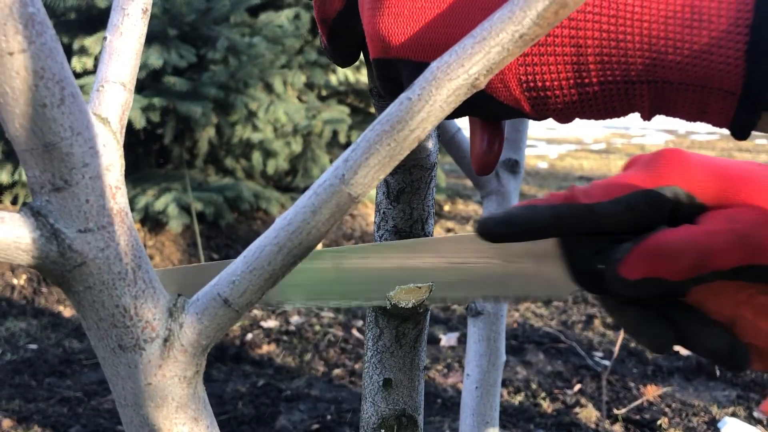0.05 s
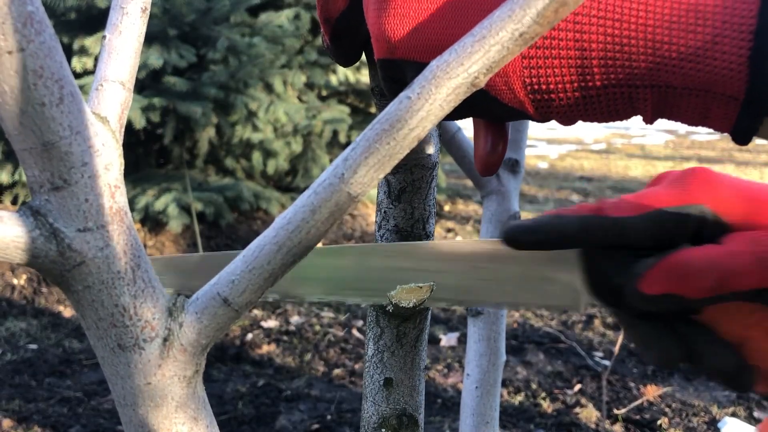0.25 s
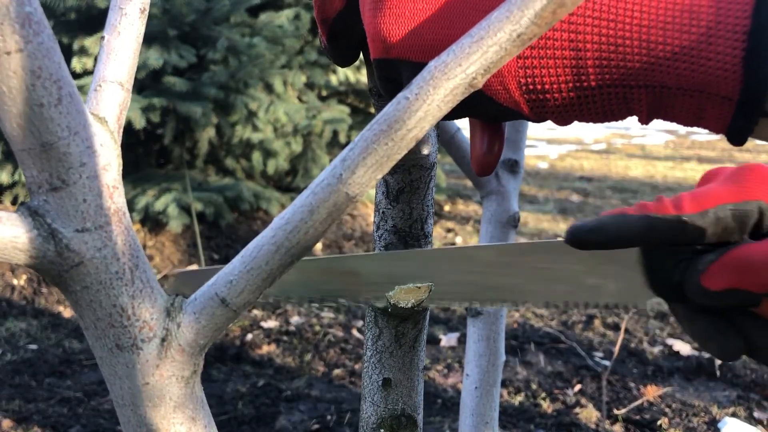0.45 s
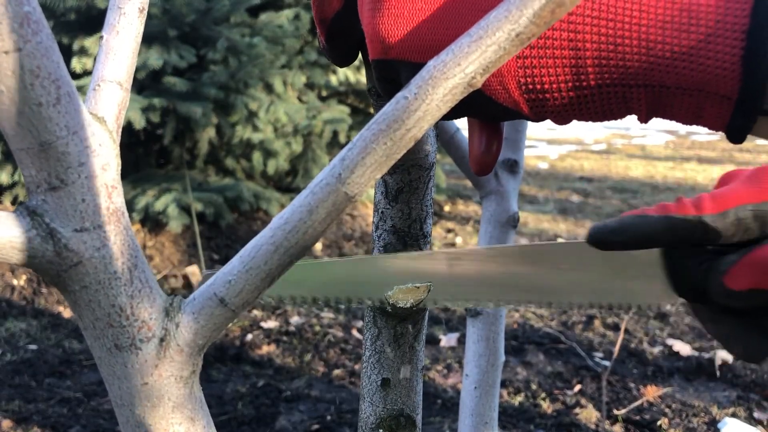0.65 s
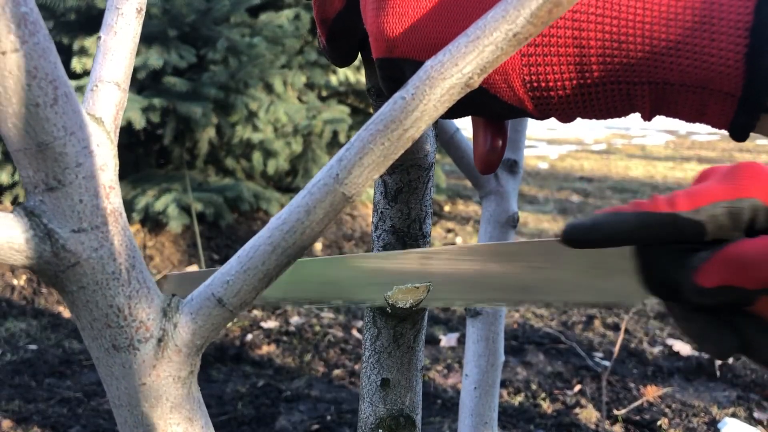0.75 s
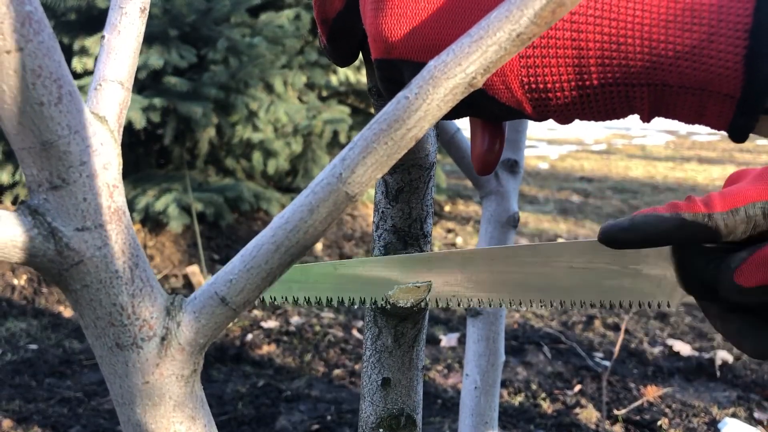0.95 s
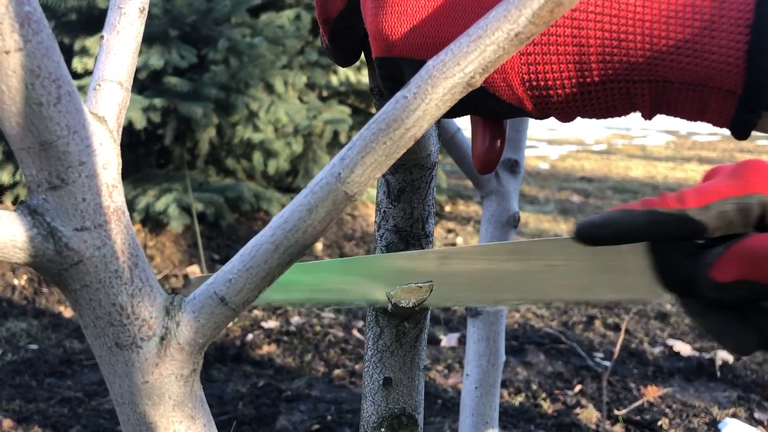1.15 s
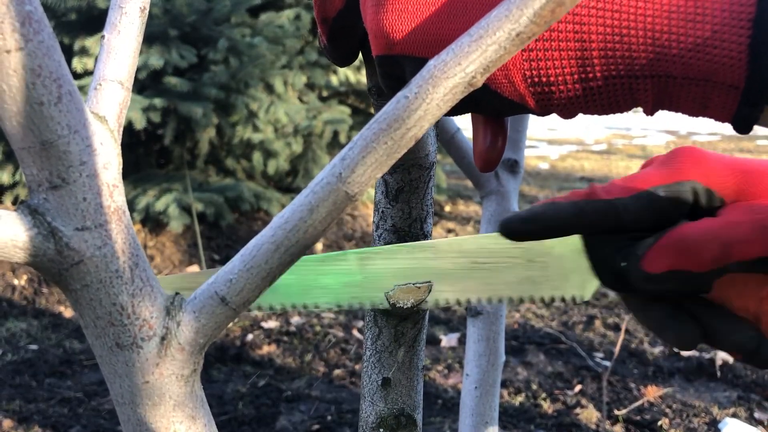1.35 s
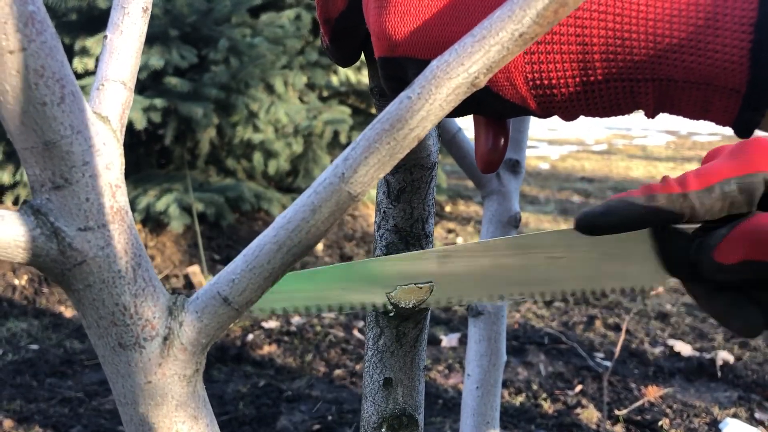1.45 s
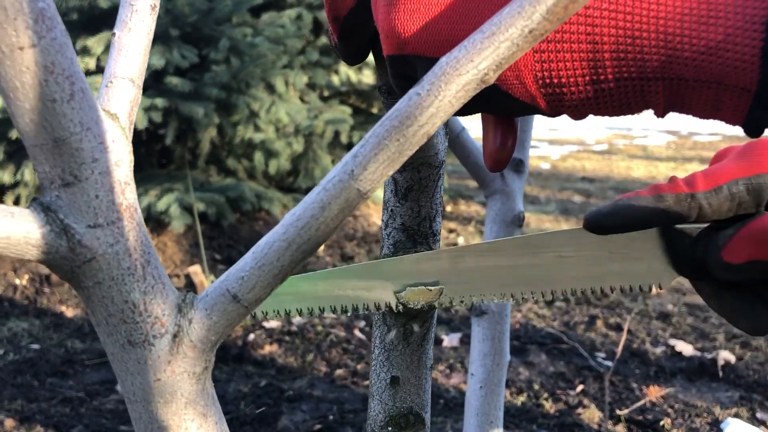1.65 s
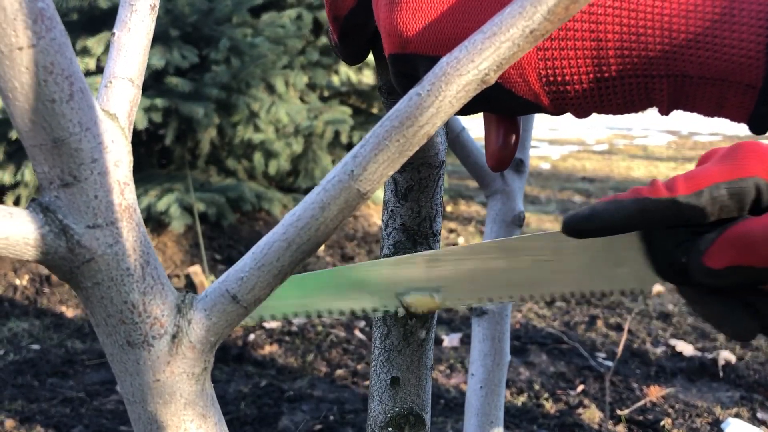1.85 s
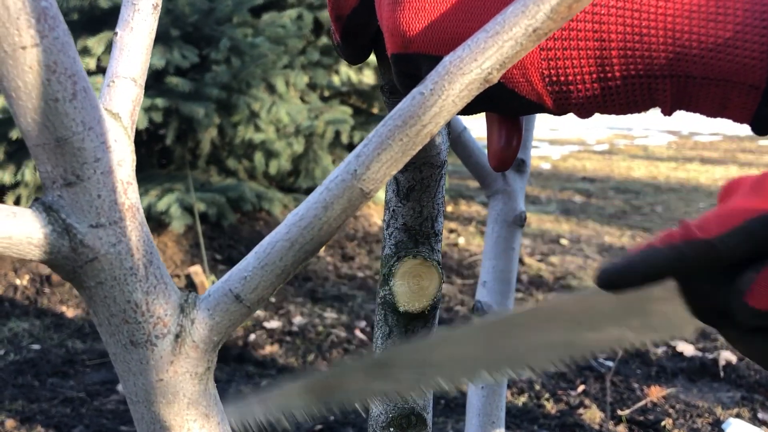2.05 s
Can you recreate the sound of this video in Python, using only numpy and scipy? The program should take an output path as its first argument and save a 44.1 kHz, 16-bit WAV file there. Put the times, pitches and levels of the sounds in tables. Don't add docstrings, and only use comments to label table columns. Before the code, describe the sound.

A pruning saw rasps quickly through a thin tree branch, close to the microphone, about eight strokes a second, with small squeaks and catches; outdoors, a distant engine drone and traffic rumble lie beneath.

```python
import sys
import numpy as np
from scipy import signal
from scipy.fft import rfft, irfft, next_fast_len
from scipy.io import wavfile
from scipy.ndimage import uniform_filter1d, map_coordinates

SR = 44100
rng = np.random.default_rng(int(sys.argv[2]) if len(sys.argv) > 2 else 0)


def transcribe(u):
    v = np.clip(np.atleast_2d(u).T, -1, 1)
    q = np.round(v * 32767).astype(np.int16)
    wavfile.write(sys.argv[1], SR, q)


def how_loud(loudness_db):
    steps = np.asarray(loudness_db, float) / 20
    return 10 ** steps


N = 92169

# frequency in Hz, density in dB per Hz.
RUMBLE_COLOUR = [(4.7, -53), (8.0, -7), (37, -4.5), (60, -5), (156, -19.5), (206, -35.5), (260, -27),
                 (340, -58), (570, -120)]
# frequency in Hz, density in dB per Hz.
TYRE_COLOUR = [(110, -31), (190, -7), (500, -13), (1050, -15), (1550, -21.5), (1900, -30), (2700, -38),
               (5700, -90)]
# time in seconds, level in dB.
TYRE_LEVEL = [
    (0, -42.5),
    (.9, -43),
    (1.5, -42),
    (2.09, -42.5),
]
# frequency in Hz, density in dB per Hz.
AIR_COLOUR = [(1500, -24), (3000, -2.5), (8500, 3.5), (11000, -6), (13500, -11), (15800, -18)]

# multiple of the cycle rate, level in dB, swell in dB, swell centre in seconds,
# swell length in seconds.
ENGINE_ORDERS = [(1.003, -53, 17, 0.73, .4), (2, -30, -12, 0.43, 0.14), (4.01, -34.5, 5, 0.75, 0.54),
                 (5.006, -41.5, -3.5, 1.5, .25), (6, -36.5, 9.5, 0.64, 0.38), (7.99, -44.5, 7, 0.95, 0.48),
                 (10, -39.5, 2, 1.1, 0.24), (11.89, -58, 9.5, .9, .5), (16.6, -67, 10, 2, .3),
                 (20, -61, 10, 1.95, 0.37), (23.43, -66.5, 9, 1.98, .25), (25, -63.5, 4.5, 1.9, 0.21),
                 (29.35, -68, 9, 2.07, .1), (33.47, -68, 5, 1.83, 0.42)]

# time in seconds, level in dB, length in seconds, ring in Hz.
CATCHES = [(0.51, -39, .0025, 5000), (0.579, -39.5, .008, 8000), (.752, -43, .003, 5500),
           (1.44, -33, 0.011, 8400), (1.687, -36.5, .006, 8600), (1.9, -39, 0.0066, 5990),
           (1.921, -45, 0.0061, 8500), (1.943, -43, .006, 8040), (.77, -44, .003, 8300),
           (1.253, -50, .003, 4500), (.721, -40, .005, 8500)]
CATCH_WIDTH = [1.6, 0.17, 1.4, .12, 0.1494, 0.82, .3, .4, .5, 1.3, .3]

TURNS = [-.03, .108, .235, .373, .5, .624, .746, .872, 1.0, 1.12, 1.243, 1.377, 1.508, 1.621, 1.742, 1.856,
         1.975]
# stroke pressure in dB, moment of top speed as a share of the stroke.
STROKES = [(-40.5, .5), (-39, .55), (-43, .5), (-38.5, .5), (-43.5, .6), (-39, .55), (-44, .5), (-41, .5),
           (-45.5, .5), (-40, .5), (-44.5, .6), (-41, .5), (-46.5, .5), (-41, .5), (-48.5, .5), (-47, .55)]
# frequency in Hz, density in dB per Hz.
PUSH_COLOUR = [(1060, -35), (1800, -4.5), (2900, -7), (3500, -6), (4500, -5.5), (8600, 2), (10900, -10.5),
               (14300, -17), (15600, -26)]
# frequency in Hz, density in dB per Hz.
PULL_COLOUR = [(1060, -45), (1800, -9.5), (2900, -8), (3500, -8), (6700, -5.5), (8560, 0.5), (10800, -10),
               (14300, -20), (15600, -25)]
# frequency in Hz, width in Hz, gain in dB.
BLADE_MODES = [(3434, 70, 3.5), (4160, 92, 4.5), (5300, 87, 4.5), (6190, 76, 5), (7280, 90, 2.5),
               (7690, 59, 3), (8360, 110, 4.5), (8740, 80, 5), (9470, 120, 5), (13100, 600, 3.5)]
# time in seconds, level in dB.
SLIDE_OUT = [
    (1.96, -64),
    (2.0, -61),
    (2.05, -59),
    (2.07, -74),
    (2.09, -70),
]
SMOOTH = [.65, .5]

# centre in seconds, frequency in Hz below which all stays, share lost.
THINNED = [
    (.1135, 1900, .75),
    (.3225, 700, .9),
    (1.1585, 1500, .97),
    (1.2746, 1500, .97),
    (1.4835, 1300, .97),
    (1.6693, 1200, .95),
    (1.855, 1900, .85),
]


def unit(x):
    return x / np.sqrt(np.mean(x ** 2) + 1e-20)


def along(points, hz):
    f, v = np.transpose(points)
    return how_loud(np.interp(np.log(hz + 1), np.log(f + 1), v))


def curve(rows):
    return np.interp(np.arange(N) / SR, *np.transpose(rows))


def wobble(rate):
    return map_coordinates(rng.standard_normal(N // 50), [np.arange(N) * rate / SR])


def filtered(x, response):
    m = next_fast_len(N + SR // 2)
    return irfft(rfft(x, m) * response(np.fft.rfftfreq(m, 1 / SR)), m)[:N]


def peak(f, hz, width):
    return 1j * f * width / (hz * hz - f * f + 1j * f * width)


def patchy(patchy_db, wide, long):
    z = signal.stft(rng.standard_normal(N), nperseg=512)[2]
    field = uniform_filter1d(rng.standard_normal(z.shape), size=wide, axis=0)
    field = uniform_filter1d(field, size=long, axis=1)
    return unit(signal.istft(z * how_loud(patchy_db * unit(field)), nperseg=512)[1][:N])


def rush(points, patchy_db):
    return unit(filtered(patchy(patchy_db, wide=6, long=12), lambda f: along(points, f)))


def traffic():
    rumble = how_loud(-30.5 + 1.2 * wobble(2.88)) * rush(RUMBLE_COLOUR, patchy_db=-0.5)
    tyres = how_loud(curve(TYRE_LEVEL) + 0.83 * wobble(9.07)) * rush(TYRE_COLOUR, patchy_db=1.5)
    air = how_loud(-61) * rush(AIR_COLOUR, patchy_db=-0.5)
    return rumble + tyres + air


def engines():
    cycle_hz, unsteady = 15.28, .003
    machine_hz, machine_db, machine_rise_db = 48.88, -24, -1
    flutter_db, engine_db = 2, 4.5
    t = np.arange(N) / SR
    turn = 2 * np.pi * np.cumsum(cycle_hz * (1 + unsteady * wobble(3))) / SR
    closer_db = 5.5 * np.exp((t - t[-1]) / .2)
    machine_level_db = machine_db + machine_rise_db * t + flutter_db * wobble(3.8)
    out = how_loud(machine_level_db) * np.sin(2 * np.pi * machine_hz * t)
    for order, db, swell_db, s, length in ENGINE_ORDERS:
        swell = swell_db * np.exp(-((t - s) / length) ** 2)
        level_db = db + engine_db + swell + flutter_db * wobble(5.007) + closer_db * (order > 5)
        out = out + how_loud(level_db) * np.sin(order * turn + rng.uniform(0, 2 * np.pi))
    return out


def catches():
    t, out = np.arange(N) / SR, 0
    for (s, db, length, hz), width in zip(CATCHES, CATCH_WIDTH):
        noise = rng.standard_normal(N)
        scrape = unit(filtered(noise, lambda f: peak(f, hz, width * hz) ** 2 * (f < 15000)))
        out = out + how_loud(db) * scrape * np.exp(-((t - s) / length * 2) ** 2)
    return out


def steel(f, colour):
    wood_hz, wood_db = 1190, 3
    rolloff = (f / wood_hz) ** 2 / (1 + (f / wood_hz) ** 2)
    low = how_loud(wood_db) * along(colour[1:], f) * rolloff
    body = np.where(f < colour[1][0], low, along(colour, f))
    return body * (1 + sum((how_loud(db) - 1) * peak(f, hz, w) for hz, w, db in BLADE_MODES))


def tearing(speed):
    teeth_per_s, scatter, bite_db, tear_s = 1100, .5, 3.5, .0006
    passed = np.cumsum(teeth_per_s * (REST + speed) * how_loud(scatter * 6 * wobble(300)) / SR)
    bite = how_loud(bite_db * np.clip(rng.standard_normal(N), -3, 1.6))
    teeth = np.diff(np.floor(passed), prepend=0) * bite
    tear = signal.fftconvolve(teeth, np.exp(-np.arange(400) / SR / tear_s))[:N]
    return tear / np.sqrt(np.abs(uniform_filter1d(tear ** 2, size=2000)) + 1e-9)


REST = .075


def saw():
    speed_power = np.array([.9, 1.25])
    judder_hz, judder_db = 104, np.array([1.2, 3])
    flex_hz, flex_width, flex_db = 3575, 1100, -5
    flex_at = [0.81, 0.27]
    t = np.arange(N) / SR
    place = np.interp(t, TURNS, np.arange(len(TURNS)))
    k = np.minimum(place.astype(int), len(STROKES) - 1)
    direction = k % 2
    db, top = np.array(STROKES)[k].T
    u = np.clip(place - k, 0, 1)
    speed = np.sin(np.pi / 2 * np.where(u < top, u / top, (1 - u) / (1 - top)))
    tear = tearing(speed)
    smooth = np.array(SMOOTH)[direction]
    shake = np.sin(2 * np.pi * np.cumsum(judder_hz * (1 + .15 * wobble(20))) / SR)
    shake_db = judder_db[direction] * shake * speed ** 2 + 1.12 * wobble(40.01)
    grain = np.sqrt(smooth + (1 - smooth) * tear ** 2) * how_loud(shake_db)
    force = how_loud(db) * (REST * (t < TURNS[-1]) + speed ** speed_power[direction])
    force = force + how_loud(curve(SLIDE_OUT)) * (t > SLIDE_OUT[0][0])
    out = 0
    for way, colour in enumerate([PUSH_COLOUR, PULL_COLOUR]):
        noise = patchy(2, wide=10, long=4)
        sing = how_loud(flex_db) * np.exp(-((u - flex_at[way]) / 0.19) ** 2)
        noise = noise + sing * filtered(noise, lambda f: peak(f, flex_hz, flex_width) ** 2)
        scale = np.std(filtered(noise, lambda f: steel(f, colour)))
        stroke = noise * grain * force * (direction == way)
        out = out + filtered(stroke, lambda f: steel(f, colour)) / scale
    return out


def scene():
    return (traffic() + engines() + catches() + saw())[None]


TOP_HZ = 15350


def thinned(x):
    kept_share, levelling, kept_db = .07, .65, 4.5
    out = x.copy()
    window = np.sin(np.pi * (np.arange(2048) + .5) / 2048)
    f = np.fft.rfftfreq(2048, 1 / SR)
    for s, safe_hz, lost in THINNED:
        cut = slice(round(s * SR) - 1024, round(s * SR) + 1024)
        z = rfft(x[cut] * window)
        rank = np.abs(z) / (uniform_filter1d(np.abs(z), size=60) + 1e-12) ** levelling
        high = f > safe_hz
        kept = rank > np.quantile(rank[high & (f < TOP_HZ)], 1 - kept_share)
        change = np.where(kept, how_loud(kept_db) - 1, -lost)
        out[cut] += window ** 2 * irfft(z * high * change)
    return out


def band_limit(x):
    return signal.sosfilt(signal.butter(12, 15660, fs=SR, output="sos"), x)


def record(dry):
    x = filtered(dry[0], lambda f: 1 / (1 + (f / TOP_HZ) ** 60))
    x = x * np.clip((N - np.arange(N)) / SR / .004 + .35, 0, 1)
    return band_limit(thinned(x)[None])


dry = scene()
out = record(dry)
transcribe(out)
```